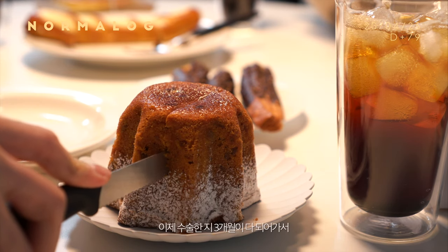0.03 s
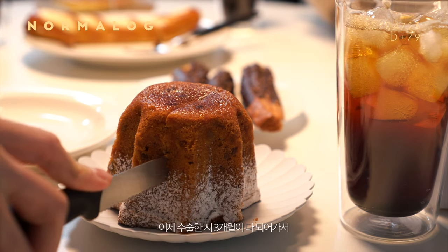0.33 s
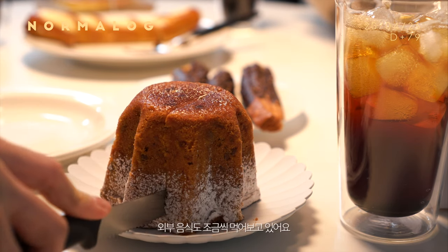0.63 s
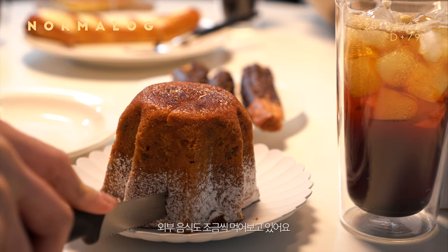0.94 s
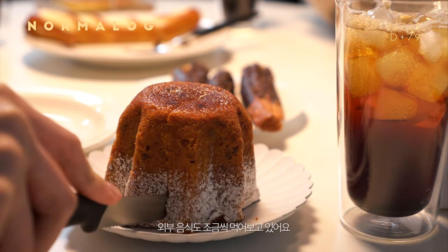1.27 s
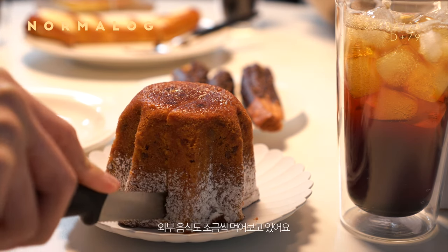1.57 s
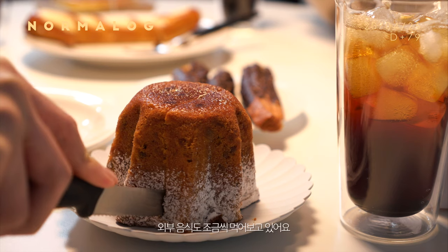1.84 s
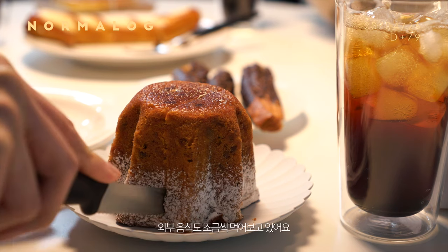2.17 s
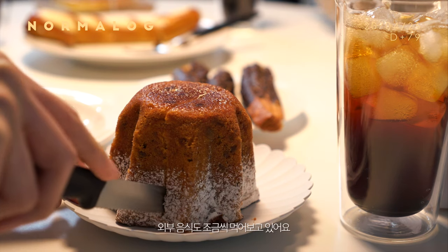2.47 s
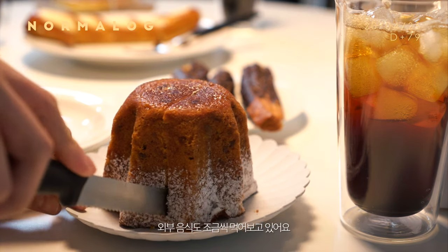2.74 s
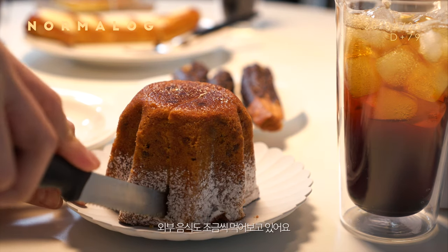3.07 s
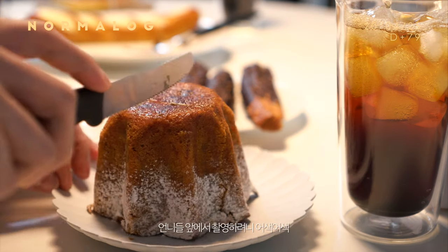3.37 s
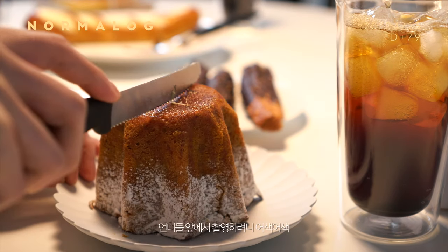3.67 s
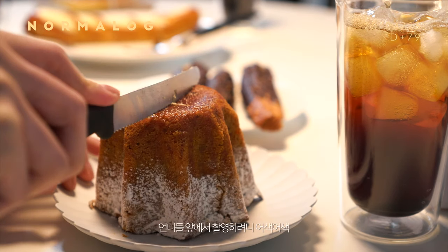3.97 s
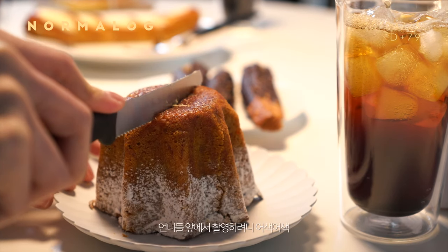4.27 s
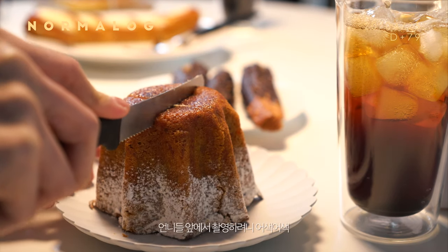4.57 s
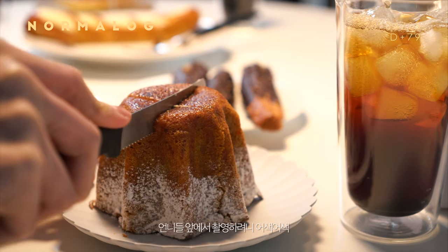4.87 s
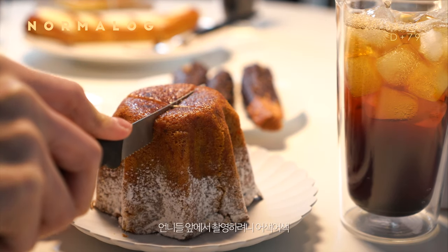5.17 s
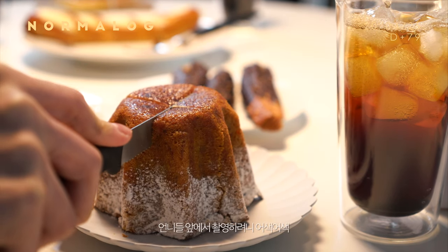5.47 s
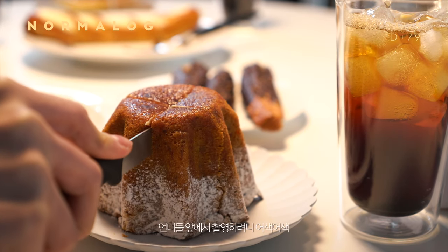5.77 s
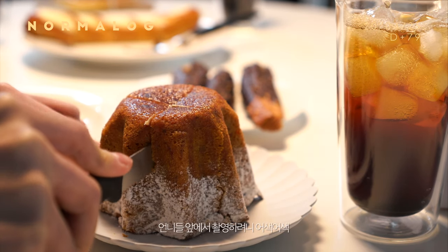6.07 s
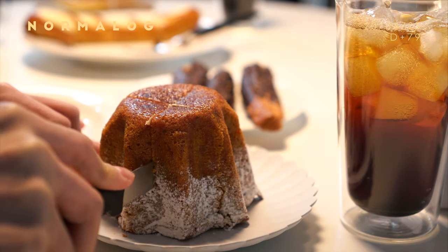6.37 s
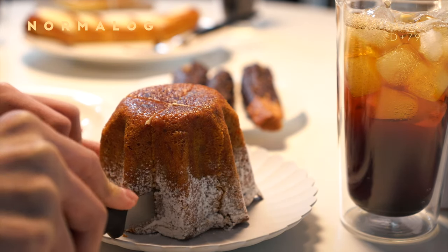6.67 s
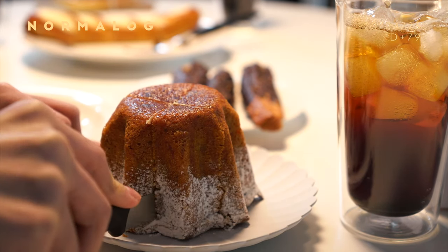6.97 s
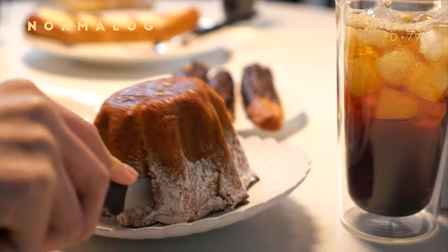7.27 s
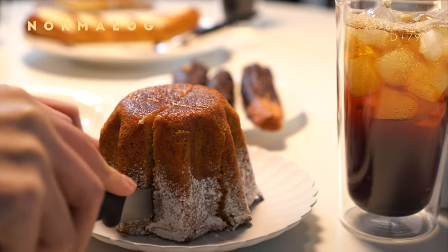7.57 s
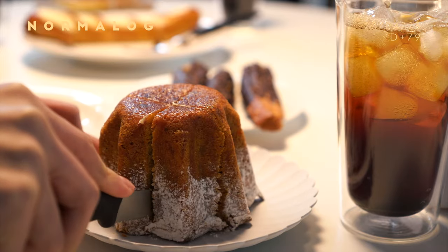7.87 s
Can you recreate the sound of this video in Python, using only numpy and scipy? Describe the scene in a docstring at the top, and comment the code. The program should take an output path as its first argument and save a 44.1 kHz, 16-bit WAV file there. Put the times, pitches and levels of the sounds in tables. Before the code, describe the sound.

Close, faint sawing and crust snaps as a knife cuts cake, with sharp clinks against the plate in a quiet room.

```python
"""A table in a small, softly ventilated room: close up, a serrated knife saws a crusty little cake.
The teeth swish through the crumb, bits of crust snap, the soft inside squashes.
Pushed by the knife, the ceramic plate rocks, stutters and slides on the table.
The blade breaks through and knocks on the plate; the hardest knocks make it chatter.
Contacts are damped modes plus a noise crack; friction is grainy, shaped noise."""
import sys
import numpy as np
from scipy import signal
from scipy.fft import rfft, irfft, next_fast_len
from scipy.io import wavfile
from scipy.ndimage import uniform_filter1d, map_coordinates

SR = 44100
rng = np.random.default_rng(int(sys.argv[2]) if len(sys.argv) > 2 else 0)


def to_wav(s):
    """Save 16-bit WAV."""
    ch = np.atleast_2d(s).T  # columns
    pcm = np.round(np.clip(ch, -1, 1) * 32767)  # PCM
    wavfile.write(sys.argv[1], SR, pcm.astype(np.int16))


N = 353241

# room decay: f/Hz, t60/s
ROOM_DECAY = [(150, 0.69), (400, 0.61), (1000, 0.58), (2700, 0.59), (5000, .48), (8000, 0.41),
              (14000, 0.05)]
# stereo width: f/Hz, side level/dB
ROOM_SIDE = [(60, -0.5), (200, 14), (380, 6), (700, -14.5), (1300, -11.5), (4400, -5.5), (9000, -8.5)]
VENT_SIDE = [(100, 5.5), (300, -4.5), (1300, -4), (4000, -0.5), (15000, 0)]

# noise spectra: f/Hz, level/dB
VENT_SPECTRUM = [(18, -58), (30, -37.5), (161, -31.5), (178, -21.5), (232, -9.5), (264, -8), (362, -5.5),
                 (523, -7), (612, -13), (816, -9), (907, -10), (1030, -12.5), (1750, -20), (3280, -24),
                 (15800, -38.5)]
SCRAPE_SPECTRUM = [(80, -43.5), (200, -12.5), (290, -7), (355, 1), (460, 7.5), (660, 1.5), (800, 2.5),
                   (1000, 1), (1900, -9), (2500, -6.5), (3600, -15.5), (4900, -18), (6800, -21.5),
                   (10000, -44)]  # plate foot on table
SQUASH_SPECTRUM = [(90, -47), (140, -26), (190, -3.5), (270, -6), (350, 5), (450, -2), (620, -12),
                   (1500, -15), (6000, -55.5)]  # soft inside of the cake
SWISH_SPECTRUM = [(200, -35), (1000, -1.5), (2300, -5), (3000, -12.5), (4300, -7.5), (4950, 3), (5600, -2),
                  (6500, 3), (7000, 6), (7500, -0.5), (8400, -3), (10000, -16), (15000, -29)]  # teeth in crumb
RASP_SPECTRUM = [(80, -14), (250, -9.5), (900, 3), (2200, -1.5), (3500, -2.5), (4500, 1), (5500, -1.5),
                 (6300, -5.5), (8200, -18), (9700, -15), (11500, -35), (15000, -39.5)]  # dragging blade
FLEX_SPECTRUM = [(300, -55.5), (1700, -19), (2120, 9), (2420, 5.5), (2800, -30.5), (6000, -44)]  # blade bending resonance
CRACK_SPECTRUM = [(60, -46.5), (170, -32), (280, -18.5), (370, -2), (900, 2), (2000, 7), (5000, -4),
                  (7000, -11.5), (9300, -21), (11000, -39), (16000, -53.5)]  # contact noise
THUMP_SPECTRUM = [(20, -7), (55, -2.5), (110, -5), (180, 1), (260, -8), (500, -41)]  # low thump under each knock

# modes: f/Hz, level/dB, free t60/s
FOOT_MODES = [(375, 7.5, 1), (633.6, 0.5, .25), (876, -1.5, .15), (1010, 0.5, .18), (1127, 0, .18),
              (1260, -0.5, .16), (1610, 2.5, .18), (1785, -13, .12), (2430, 0, .12), (2463, -2.5, .12),
              (2861, -8, 0.14), (3570, -16, .1), (3738, -9.5, .14), (4000, -7, .14), (4830, -4, .12)]  # plate and table top, struck at the foot
PLATE_MODES = [(394, -12.5, .35), (494, 1, 0.23), (562, 1.5, .3), (654, -9.5, .2), (680, -8.5, .3),
               (746, -7.5, .2), (866.5, 8, 0.19), (887, -19.5, 0.32), (1053, -15, .3), (1350.5, -5, 0.13),
               (1420, -18.5, .3), (1544, -7, 0.17), (1714, -7, .3), (1873, -8.5, 0.15), (2070, -17.5, .3),
               (2470, -25, .3), (2700, -21, 0.29), (3080, -27, .3), (3755, -18.5, .29), (4280, -26.5, .25),
               (4500, -21, .25), (5370, -20.5, .18), (6060, -23.5, .26), (6710, -23.5, 0.24)]  # plate, struck from above
BLADE_MODES = [(3960, 12.5, 0.057), (6070, -1, 0.049), (6670, 13, 0.018), (7500, -4, 0.099),
               (9150, -10, 0.074)]

# contact bands (thud, clunk, body, edge): low f/Hz, high f/Hz
CONTACT_BANDS = [(310, 700), (700, 1050), (1050, 2800), (2800, 12000)]
# band levels per contact: thud/dB, clunk/dB, body/dB, edge/dB
TAP_BANDS_DB = [-7.5, -1.5, 0.5, -12]
JOLT_BANDS_DB = [-6.5, -6.5, -2.5, -13]
REBOUND_BANDS_DB = [-5.5, -2, 0.5, -9]
KNOCK_BANDS_DB = [-7.5, -2.5, -9.5, -20]

# plate slides, cake squashes: start t/s, end t/s, level/dB
PLATE_SLIDES = [(1.835, 1.941, -58.5), (2.606, 2.906, -54), (3.387, 3.47, -51), (3.512, 3.674, -51.5),
                (3.811, 3.844, -56.5), (4.111, 4.31, -57), (4.702, 4.835, -53.5), (7.33, 7.445, -64),
                (7.453, 7.527, -56)]
CAKE_SQUASHES = [(2.30, 2.583, -83), (4.624, 4.679, -48.5), (4.694, 4.784, -53.5)]
# foot taps, blade catching in the cake: t/s, level/dB, tilt/(dB/oct)
FOOT_TAPS = [(2.629, -33.5, 0.5), (2.680, -35.5, 3), (2.713, -36, 2.5), (2.753, -35, 2), (2.783, -33.5, 4),
             (3.395, -45.5, -3), (3.873, -29, 3.5), (3.907, -39, 1.5), (4.135, -42, -0.5), (4.166, -45, -5),
             (4.2, -40.5, -.5), (4.261, -40, -0.4), (4.518, -44, -0.7), (7.439, -32.5, 4)]
BLADE_JOLTS = [(1.083, -46.5, -3), (1.696, -43.5, 4.5), (2.543, -52.5, -3), (2.603, -36.5, -2.5),
               (3.969, -31, -3), (4.622, -40, -0.5), (4.697, -43.5, 0.8)]
# larger crust snaps: t/s, level/dB, centre f/Hz
CRUST_SNAPS = [(1.61, -39.5, 4630), (1.883, -44, 7500), (1.916, -44, 4600), (2.876, -42, 6460),
               (2.998, -25.5, 4500), (4.342, -45.5, 5000), (5.297, -41.5, 3800), (5.316, -46, 2975),
               (6.919, -37.5, 4480)]
# blade rings: t/s, level/dB, rise/s
BLADE_RINGS = [(0.728, -32, 0.00048), (0.75, -33.5, .00035), (1.106, -52, .0012), (3.815, -51, .024)]
# saw strokes: start t/s, end t/s, level/dB, drag/(0-1)
SAW_STROKES = [(1.554, 1.774, -67.5, 0.88), (1.76, 2.346, -69.5, 0.87), (2.267, 2.47, -53.5, .95),
               (3.165, 3.205, -59, 0.7), (4.725, 4.794, -53.5, 1), (4.95, 5.274, -73.5, 0.66),
               (5.76, 6.092, -76.5, 0.25), (6.08, 6.173, -60.5, 0.43), (6.18, 6.241, -57, .25),
               (6.269, 6.344, -65.5, 0.22), (6.424, 6.483, -66, 0.32), (6.532, 6.673, -65.5, .35),
               (6.693, 6.767, -54, 0.04), (6.857, 6.933, -58.5, .05), (7.225, 7.29, -63, .85)]
# plate rebounds after a 0 dB knock: delay/s, level/dB
REBOUNDS = [(.012, -3.5), (.021, -17.5), (.035, -18)]
# blade lands or plate drops back: t/s, level/dB, tilt/(dB/oct), thud/dB (less near the rim)
PLATE_KNOCKS = [(0.726, -17.5, -0.5, 1), (.749, -32, -3, 4), (.880, -32.5, -6.5, 1.5),
                (2.915, -38.5, -3, -4.5), (2.926, -7, -1, -8.5), (2.964, -28.5, 4, -2),
                (6.765, -19.5, -3.5, 5), (6.917, -42.5, 3.5, 4.5), (7.5185, -7.5, -0.5, 0.5),
                (7.628, -19.5, -4.5, 1)]


def amp(db):
    """Decibels to gain."""
    return 10 ** (np.asarray(db) / 20)


def unit_rms(x):
    """Scale to rms 1."""
    return x / np.sqrt(np.mean(x ** 2) + 1e-20)


def curve_at(points, hz):
    """Interpolate (f/Hz, value) points on a log axis."""
    f, values = np.transpose(points)
    return np.interp(np.log(hz + 1), np.log(f + 1), values)


def colour(x, spectrum):
    """Filter by a (f/Hz, level/dB) curve."""
    n = x.shape[-1]
    n_fft = next_fast_len(n + 4096)
    gain = amp(curve_at(spectrum, np.fft.rfftfreq(n_fft, 1 / SR)))
    return irfft(rfft(x, n_fft) * gain, n_fft)[..., :n]


def add(track, at_s, sound):
    """Mix in at at_s."""
    start = max(0, round(at_s * SR))
    part = sound[..., :N - start]
    track[:, start:start + part.shape[-1]] += part


def pan(x, left_db):
    """Set the left level left_db above the right."""
    return x * amp([[left_db / 2], [-left_db / 2]])


def wide_noise(n, side_spectrum):
    """Stereo noise: white mid, shaped side."""
    mid, side = rng.standard_normal((2, n))
    side = colour(side, side_spectrum)
    return np.array([mid + side, mid - side])


def noise_burst(t, spectrum, t60_s, rise_s):
    """Shaped noise, fast rise, exponential decay."""
    noise = unit_rms(colour(rng.standard_normal(len(t)), spectrum))
    return noise * amp(-60 * t / t60_s) * (1 - np.exp(-t / rise_s))


def in_room(x, wet_db, early_db=-1, early_t60_s=0.11):
    """Direct sound, quick tableware echoes and the room's longer tail."""
    t = np.arange(SR // 2) / SR
    hz, frame_s, bins = signal.stft(wide_noise(len(t), ROOM_SIDE), SR, nperseg=256)
    decay = amp(-60 * frame_s / curve_at(ROOM_DECAY, hz)[:, None])
    tail = signal.istft(bins * decay, SR, nperseg=256)[1][:, :len(t)]
    tail *= 1 - np.exp(-t / 0.0012)
    early = wide_noise(len(t), ROOM_SIDE) * amp(-60 * t / early_t60_s) * (1 - np.exp(-t / 0.0034))
    response = amp(wet_db) * (unit_rms(tail) + amp(early_db) * unit_rms(early)) / np.sqrt(len(t))
    response[:, 0] += 1
    return signal.fftconvolve(np.atleast_2d(x), response, axes=1)


def friction(length_s, spectrum, grain_db, swell_power=0.82):
    """One stroke: tiny uneven slips under a swell."""
    n = max(64, round(length_s * SR))
    slips = map_coordinates(rng.standard_normal(n // 20 + 4), [np.arange(n) / 20])
    grains = unit_rms(colour(rng.standard_normal(n) * amp(grain_db * slips), spectrum))
    swell = np.sin(np.pi * (np.arange(n) + .5) / n) ** swell_power
    return grains * unit_rms(swell)


def unit_attack(x):
    """Scale to rms 1 over the first 12.5 ms."""
    return x / np.std(x[:, :SR // 80])


def tilted(bands_db, db_per_oct, above_hz):
    """Contact hardness: band levels tilt above a corner."""
    centres_hz = np.sqrt(np.prod(CONTACT_BANDS, axis=1))
    return np.asarray(bands_db) + db_per_oct * np.maximum(0, np.log2(centres_hz / above_hz))


def contact(modes, bands_db, damped_t60_s, free_db, crack_db, crack_t60_s):
    """Stereo blow: a crack plus modes, mostly damped at once; a little rings on."""
    spread_db, radiation_rad = .8, .22
    t = np.arange(SR // 4) / SR
    hz, db, t60_s = np.transpose(modes)[:, :, None]
    decay = amp(-60 * t / damped_t60_s) + amp(free_db - 60 * t / t60_s)
    # each mode is caught on a crest or trough and radiates in its own direction
    polarity = rng.choice([-1, 1], len(modes))
    strength = polarity * amp(db.T + spread_db * rng.standard_normal((2, len(modes))))
    skew_rad = radiation_rad * rng.choice([-1, 1], len(modes)) * np.array([[1], [-1]])
    ring = np.imag((strength * np.exp(1j * skew_rad)) @ (decay * np.exp(2j * np.pi * hz * t)))
    crack = noise_burst(t, CRACK_SPECTRUM, crack_t60_s, rise_s=0.00033)
    hit = unit_attack(ring) + amp(crack_db) * crack
    # hardness and place of contact weight the bands
    filters = [signal.butter(3, band, "bandpass", fs=SR, output="sos") for band in CONTACT_BANDS]
    parts = [unit_attack(signal.sosfilt(sos, hit)) for sos in filters]
    return unit_attack(sum(amp(band_db) * part for band_db, part in zip(bands_db, parts)))


def plate_blow(bands_db):
    """Plate struck from above, damped by the cake."""
    return contact(PLATE_MODES, bands_db, damped_t60_s=.036, free_db=-28, crack_db=-1.5, crack_t60_s=.014)


def ventilation(level_db=-58, waver_db=1.47, waver_hz=3.2):
    """Soft rush of air, wavering slightly."""
    air = unit_rms(colour(wide_noise(N, VENT_SIDE), VENT_SPECTRUM))
    knots = np.arange(N) / SR * waver_hz
    waver = map_coordinates(rng.standard_normal(int(knots[-1]) + 4), [knots])
    return amp(level_db + waver_db * waver) * air


def plate_slides():
    """The unglazed foot scrapes along the table."""
    out = np.zeros((2, N))
    for start_s, end_s, db in PLATE_SLIDES:
        scrape = friction(end_s - start_s, SCRAPE_SPECTRUM, grain_db=1)
        add(out, start_s, amp(db) * in_room(scrape, wet_db=-9))
    return out


def foot_taps(give_s=.0018):
    """Pushed by the knife, the plate stutters and rocks on its foot."""
    out = np.zeros((2, N))
    for at_s, db, tilt in FOOT_TAPS:
        bands_db = tilted(TAP_BANDS_DB, tilt, above_hz=350)
        hit = contact(FOOT_MODES, bands_db, damped_t60_s=.032, free_db=-33, crack_db=0, crack_t60_s=.059)
        add(out, at_s + give_s, amp(db) * in_room(pan(hit, left_db=-3), wet_db=-7))
    return out


def cake_squashes():
    """The soft inside gives with a dull crunch."""
    out = np.zeros((2, N))
    for start_s, end_s, db in CAKE_SQUASHES:
        crunch = friction(end_s - start_s, SQUASH_SPECTRUM, grain_db=0)
        add(out, start_s, amp(db) * in_room(crunch, wet_db=-6))
    return out


def crust_snaps(crumb_count=12, crumb_db=-54, spread_db=1.5, crumb_hz=5000, t60_s=0.016):
    """Crust and random tiny crumbs break: each a noise burst around its own pitch."""
    out, t = np.zeros((2, N)), np.arange(SR // 20) / SR
    crumbs = [(rng.uniform(.9, 7.4), rng.normal(crumb_db, spread_db), crumb_hz * rng.lognormal(0, .2))
              for _ in range(crumb_count)]
    for at_s, db, hz in CRUST_SNAPS + crumbs:
        burst = rng.standard_normal(len(t)) * amp(-60 * t / t60_s)
        spectrum = [(hz / 25, -45), (hz / 5, -12), (hz, 0), (hz * 1.2, -4), (hz * 3, -30)]
        snap = colour(np.pad(burst, (SR // 1000, 0)), spectrum)
        add(out, at_s, amp(db) * in_room(snap / np.abs(snap).max(), wet_db=-9.5))
    return out


def blade_rings(flutter_depth=.5):
    """Jolted or brushed steel rings briefly, with a slight flutter."""
    out, t = np.zeros((2, N)), np.arange(SR // 4) / SR
    for at_s, db, rise_s in BLADE_RINGS:
        flutter = 1 + flutter_depth * unit_rms(uniform_filter1d(rng.standard_normal(len(t)), size=40))
        ring = sum(amp(mode_db - 60 * t / t60_s) * np.sin(2 * np.pi * hz * t)
                   for hz, mode_db, t60_s in BLADE_MODES)
        ring *= (1 - np.exp(-t / rise_s)) ** 2
        add(out, at_s, amp(db) * in_room(flutter * ring / np.abs(ring).max(), wet_db=-18))
    return out


def blade_jolts(give_s=.0025):
    """The blade catches and lets go; the plate rings faintly through the cake."""
    out = np.zeros((2, N))
    for at_s, db, tilt in BLADE_JOLTS:
        hit = plate_blow(tilted(JOLT_BANDS_DB, tilt, above_hz=640))
        add(out, at_s + give_s, amp(db) * in_room(pan(hit, left_db=-0.7), wet_db=-8))
    return out


def sawing(flex_db=-31.5):
    """Teeth swish through the crumb; drag adds a lower rasp; a free-moving blade flexes."""
    out = np.zeros((2, N))
    for start_s, end_s, db, drag in SAW_STROKES:
        swish, rasp, flex = (friction(end_s - start_s, spectrum, grain_db=4, swell_power=.55)
                             for spectrum in (SWISH_SPECTRUM, RASP_SPECTRUM, FLEX_SPECTRUM))
        hiss = amp(db) * (np.sqrt(1 - drag) * swish + np.sqrt(drag) * rasp)
        flex *= (1 - drag) * amp(db / 2 + flex_db)  # grows more slowly than the hiss
        add(out, start_s, in_room(pan(hiss + flex, left_db=1.5), wet_db=-9.5))
    return out


def plate_chatter(lift_db=-13):
    """Only hard knocks lift the plate; rebounds grow with the square of the blow."""
    out = np.zeros((2, N))
    for at_s, db, *_ in PLATE_KNOCKS:
        if db > lift_db:
            for delay_s, rebound_db in REBOUNDS:
                hit = contact(FOOT_MODES, REBOUND_BANDS_DB, damped_t60_s=.03, free_db=-26.5,
                              crack_db=5.5, crack_t60_s=.022)
                add(out, at_s + delay_s, amp(2 * db + rebound_db) * in_room(hit, wet_db=-6.5))
    return out


def plate_knocks(give_s=.0025, cushion_hz=1040, push_db=-21.5, thump_db=-40):
    """The blade breaks through and hits the plate, cushioned by crumb; a low thump sounds under it."""
    out, t = np.zeros((2, N)), np.arange(SR // 4) / SR
    for at_s, db, tilt, thud_db in PLATE_KNOCKS:
        bands_db = tilted(KNOCK_BANDS_DB, tilt, cushion_hz)
        bands_db[0] += thud_db
        hit = plate_blow(bands_db)
        add(out, at_s + give_s, amp(db) * in_room(pan(hit, left_db=-0.7), wet_db=-12))
        # dull push through the crumb before the steel lands; grows with the square of the blow
        push = signal.sosfilt(signal.butter(2, 1200, fs=SR, output="sos"), hit)
        add(out, at_s - .005, amp(2 * db + push_db) * push)
        thump = noise_burst(t, THUMP_SPECTRUM, t60_s=.15, rise_s=0.0017)
        add(out, at_s + give_s, amp(db + thump_db) * pan(thump, left_db=2.5))
    return out


def scene():
    """Knife, cake and plate in the room."""
    contacts = plate_knocks() + plate_chatter() + blade_jolts() + foot_taps()
    cutting = crust_snaps() + sawing() + cake_squashes()
    return contacts + cutting + plate_slides() + blade_rings() + ventilation()


def record(dry, hardness=8, top_hz=15850):
    """Soft overload on the hardest knocks, then a brick-wall low-pass."""
    clipped = dry / (1 + np.abs(dry) ** hardness) ** (1 / hardness)
    n_fft = next_fast_len(N + 4096)
    passband = np.fft.rfftfreq(n_fft, 1 / SR) < top_hz
    return irfft(rfft(clipped, n_fft) * passband, n_fft)[:, :N]


dry = scene()
out = record(dry)
to_wav(out)
```